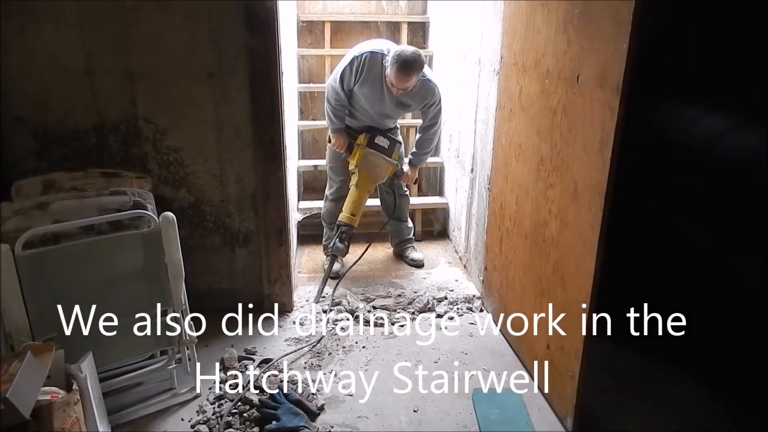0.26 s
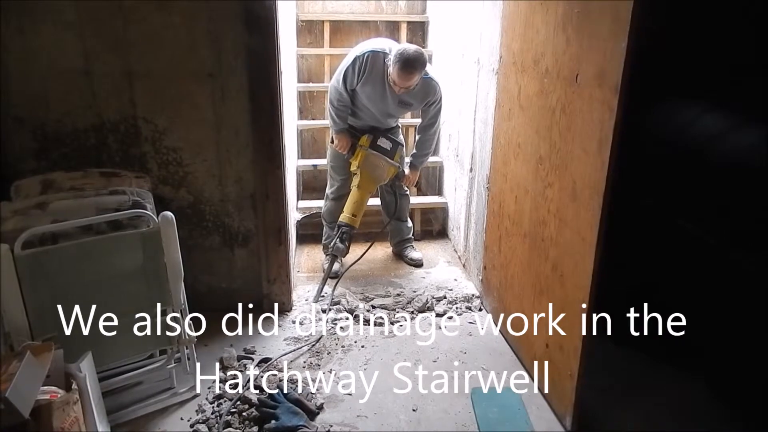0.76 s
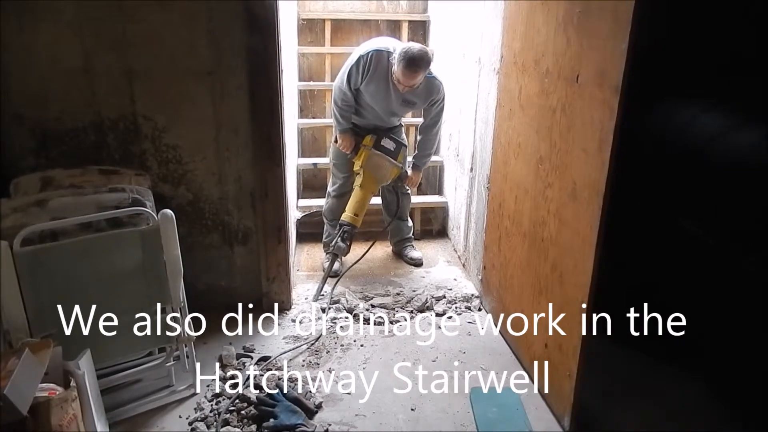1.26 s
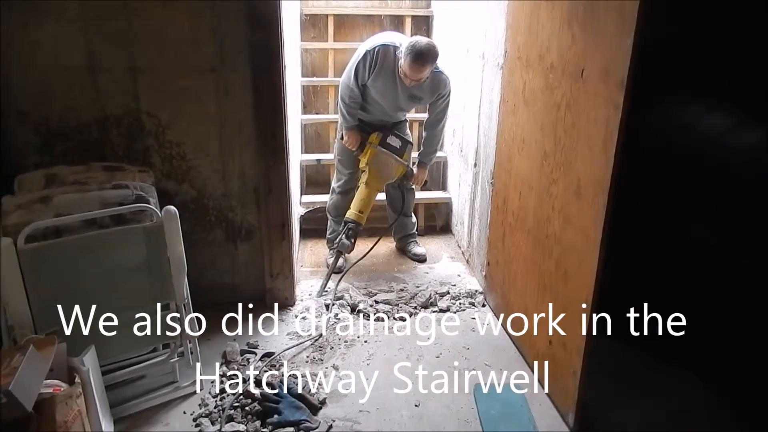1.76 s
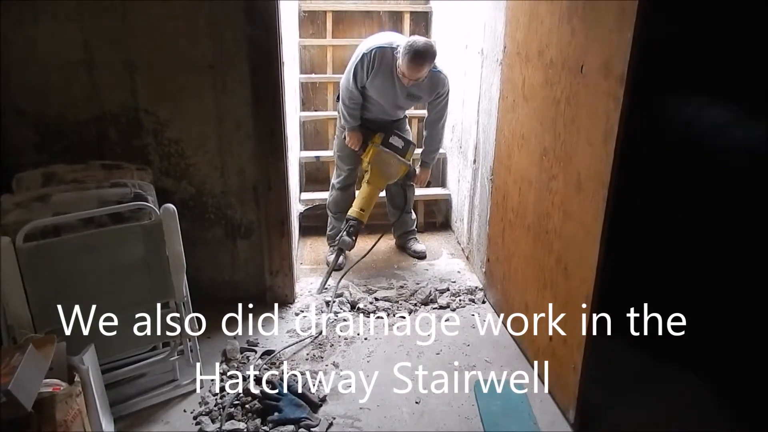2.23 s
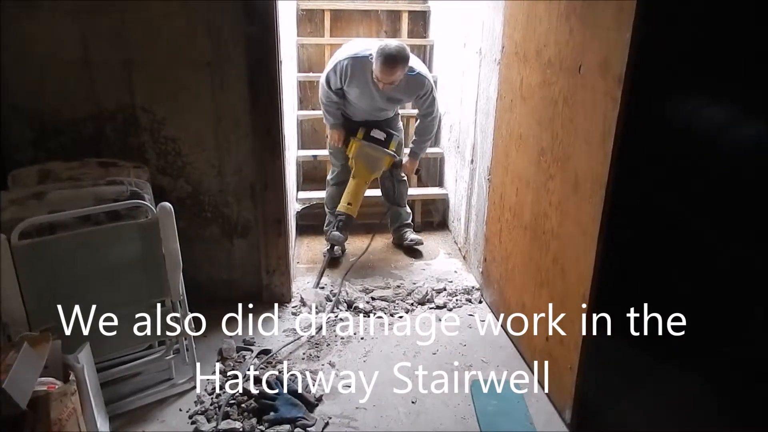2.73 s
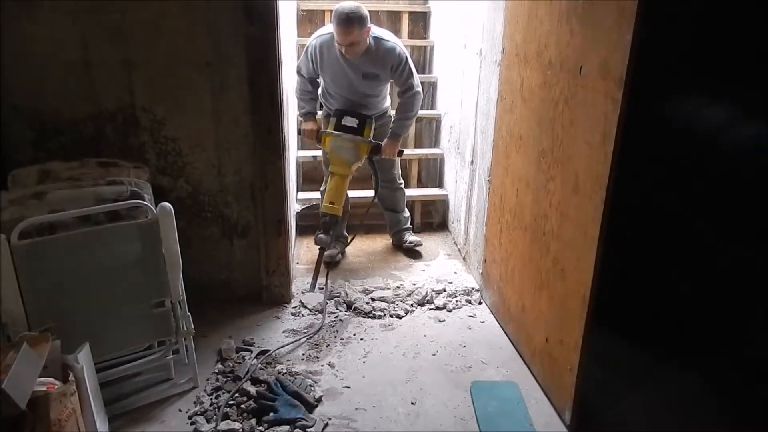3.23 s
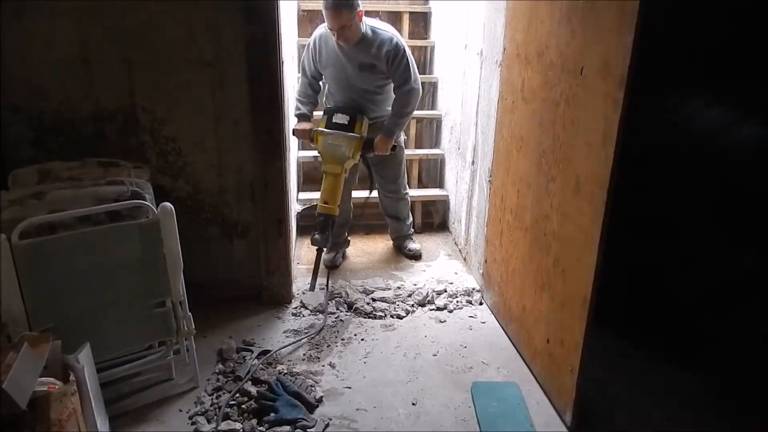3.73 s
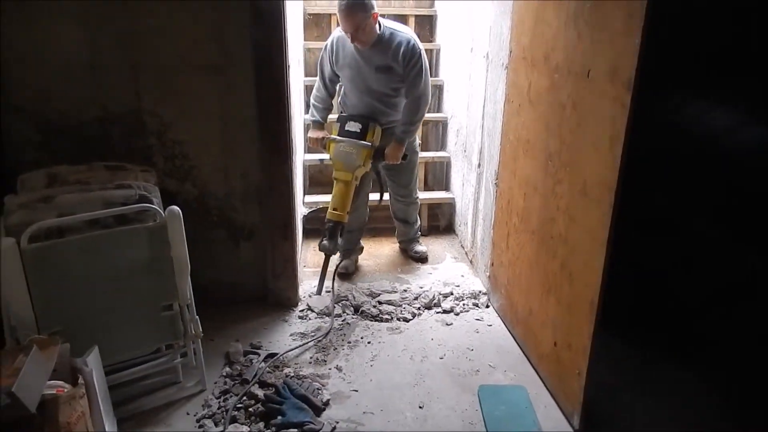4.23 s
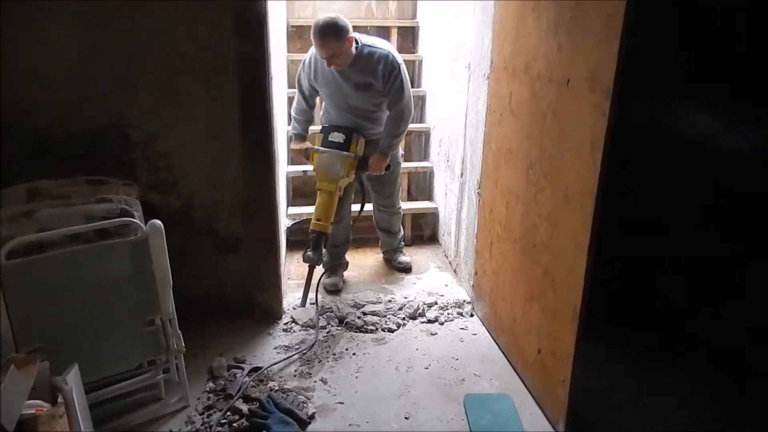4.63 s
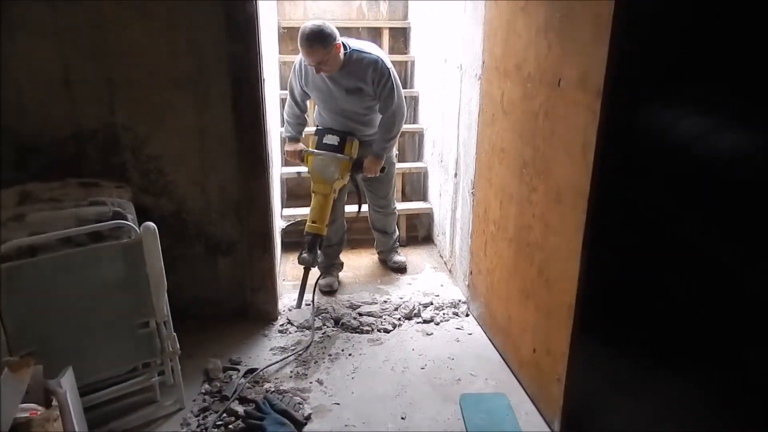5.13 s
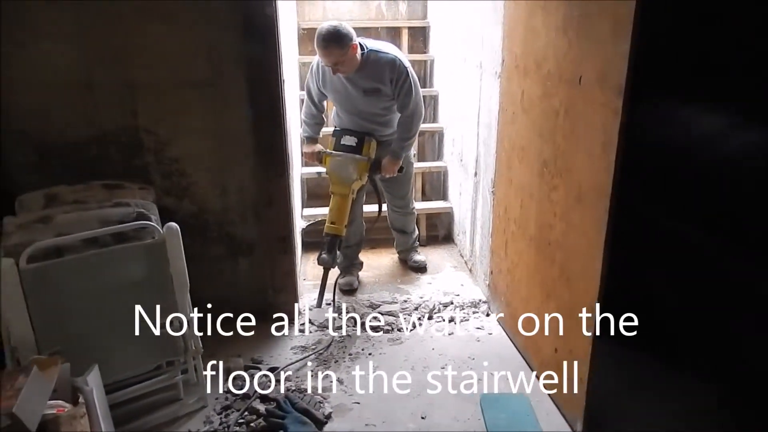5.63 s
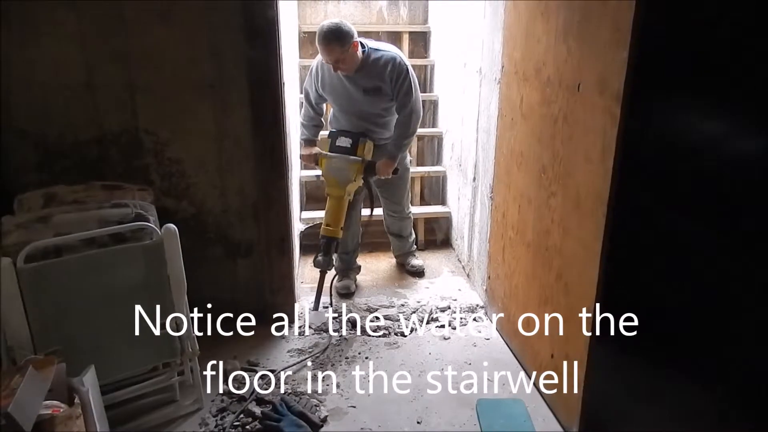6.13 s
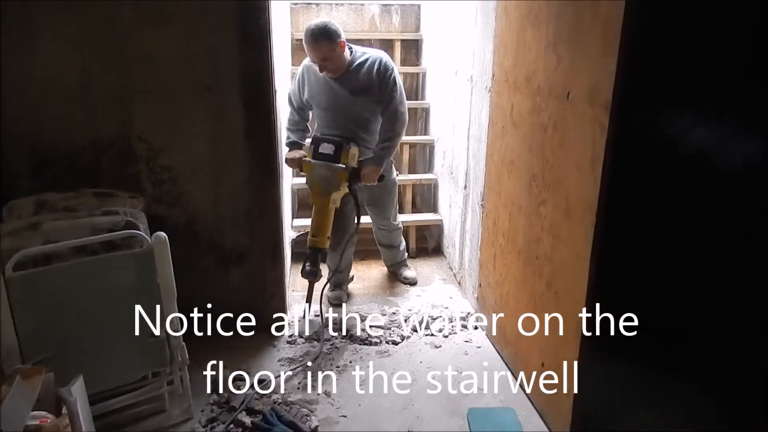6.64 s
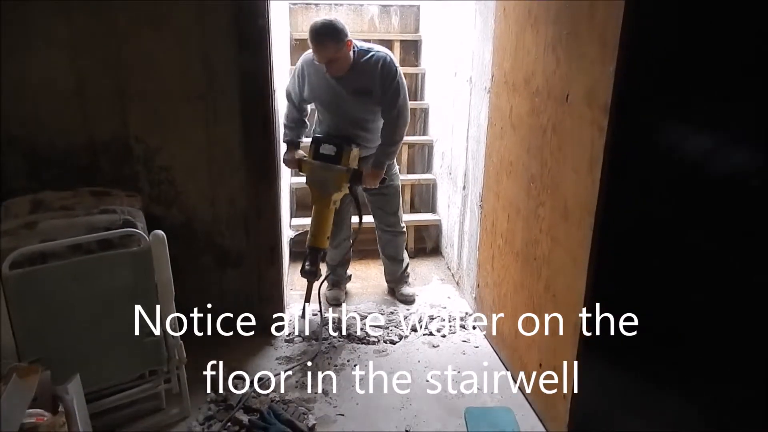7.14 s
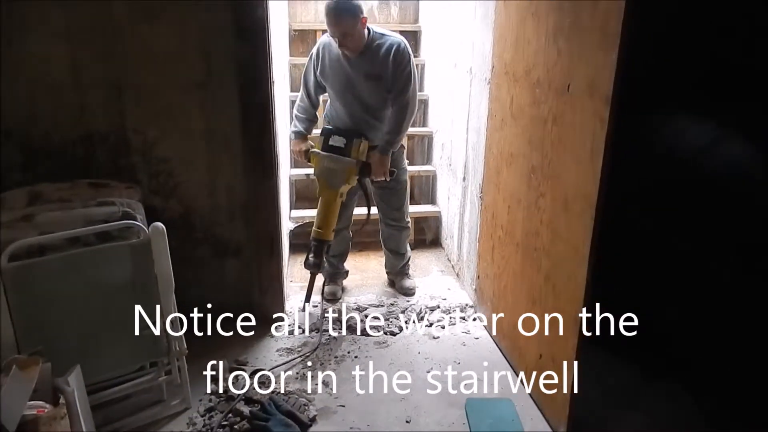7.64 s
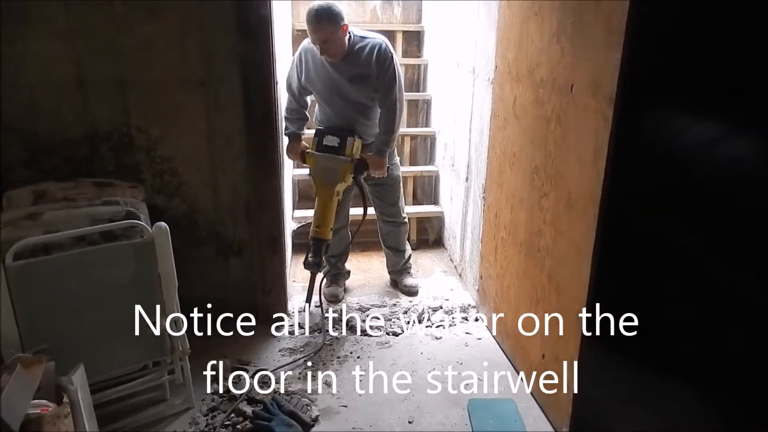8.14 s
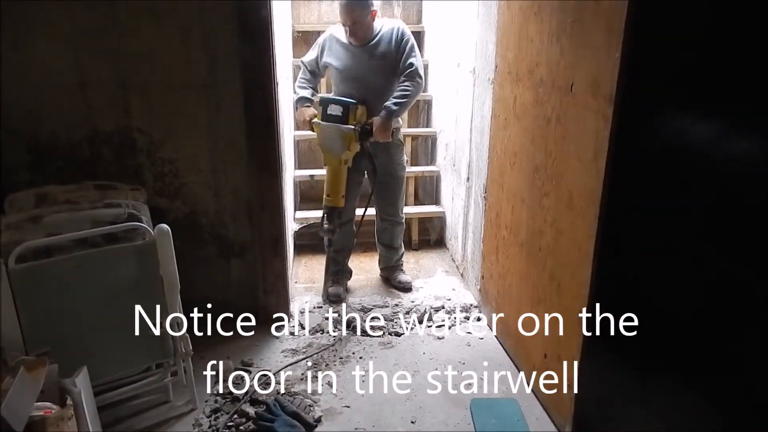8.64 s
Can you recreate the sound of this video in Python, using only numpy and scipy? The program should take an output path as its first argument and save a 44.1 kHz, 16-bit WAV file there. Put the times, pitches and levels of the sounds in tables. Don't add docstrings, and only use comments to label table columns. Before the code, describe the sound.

Close to a bare stairwell, an electric demolition hammer hammers concrete about fourteen times a second. At first each sharp steel crack comes with a deep slab boom; after two seconds the sound turns to looser, uneven crunching with bright chisel ringing. Motor rush and brush hiss fill the gaps. Near the end the blows slow, fade and stop, and the tool is set down with one clank.

```python
import sys
import numpy as np
from scipy import signal
from scipy.fft import rfft, irfft, next_fast_len
from scipy.io import wavfile

SR = 44100
rng = np.random.default_rng(int(sys.argv[2]) if len(sys.argv) > 2 else 0)


def makeup_ratio(level_db):
    decades = np.asarray(level_db, float) / 20
    return 10 ** decades


def to_wav(sig):
    pcm = np.clip(np.atleast_2d(sig), -1, 1) * 32767
    pcm = np.round(pcm).astype(np.int16)
    wavfile.write(sys.argv[1], SR, pcm.T)


N = 392037
LEAD = SR // 10
SPAN = SR // 3

# (time [s], steel crack [dB], thud [dB], slab [dB])
BLOWS = [(-0.014, -24.5, -27.5, -21.5), (0.0544, -26, -28, -22), (0.1224, -23.5, -25, -20.5),
         (0.189, -21.5, -23.5, -17.5), (0.2558, -28, -28.5, -24), (0.3262, -28.5, -33, -26.5),
         (0.394, -27, -29.5, -23.5), (0.4619, -25.5, -28.0, -22.5), (0.5293, -26.5, -29.5, -22),
         (0.598, -25, -27.5, -21.5), (0.6657, -26.5, -31.5, -22), (0.7339, -26.5, -29.0, -22.5),
         (0.8017, -24.5, -26, -21), (0.8689, -26.5, -29.0, -22), (0.9399, -26, -27.5, -22.5),
         (1.006, -25, -28.5, -20.5), (1.074, -26, -27.5, -22), (1.1418, -27, -30.0, -23.5),
         (1.2104, -29, -30.5, -24), (1.2781, -28, -29.5, -24), (1.3465, -27, -28.5, -23),
         (1.415, -26.5, -29.0, -24), (1.483, -26, -31, -23), (1.5522, -26.5, -28.5, -22.5),
         (1.6186, -28, -30.5, -23), (1.6887, -27.5, -28.5, -22.5), (1.7569, -26.5, -29.5, -23.5),
         (1.825, -26.5, -29.5, -23), (1.8945, -28.5, -31.0, -23), (1.962, -26.5, -28.5, -23.5),
         (2.0309, -25.5, -28, -22), (2.1011, -25.5, -29.0, -25.5), (2.17, -27, -29.5, -26.5),
         (2.2389, -26.5, -28.5, -34), (2.3088, -25.0, -31.0, -30.5), (2.3782, -24.5, -37.0, -34),
         (2.4505, -25.5, -35, -35), (2.521, -26.0, -35.5, -31), (2.5933, -25.0, -38.5, -28.5),
         (2.6637, -24.0, -36.5, -27.5), (2.7362, -24, -49, -26), (2.8081, -24, -36.5, -28),
         (2.881, -23.5, -36.5, -25.5), (2.9518, -24.5, -35.5, -30.0), (3.027, -24.5, -35, -28),
         (3.0945, -23.5, -32.5, -29.0), (3.165, -25.5, -34.0, -25.5), (3.2352, -22.5, -33, -25),
         (3.302, -25.5, -32.5, -27), (3.373, -26, -35, -27.0), (3.44, -25.5, -32, -28),
         (3.5115, -26, -31.5, -30.5), (3.5777, -29.5, -32, -28.5), (3.6518, -26.0, -33, -30),
         (3.7197, -26.5, -31, -29.0), (3.7917, -26.5, -35, -34.5), (3.8584, -25, -31, -27),
         (3.93, -24, -30.0, -25.0), (3.9978, -25.0, -31.5, -29.5), (4.0693, -28.5, -34, -32.5),
         (4.1393, -26.5, -32, -28.5), (4.213, -26, -30.5, -30), (4.2812, -25.5, -34, -26.5),
         (4.352, -25, -30, -28.0), (4.4214, -24.5, -33.0, -28.0), (4.492, -26.5, -29.0, -28),
         (4.561, -27.5, -31.5, -29), (4.631, -25.5, -33.5, -29), (4.702, -27.5, -34, -32.5),
         (4.771, -27.5, -30.5, -26), (4.841, -24.5, -27, -22), (4.9098, -25, -29.5, -25.0),
         (4.9792, -24, -32.5, -26.0), (5.0502, -24.5, -32, -26.5), (5.1183, -28.0, -35.5, -28.5),
         (5.189, -25, -34.5, -27.0), (5.257, -23.5, -29, -23.5), (5.3241, -24.5, -29, -24.5),
         (5.3943, -26.5, -29, -25.5), (5.464, -23.5, -31.0, -25.5), (5.5325, -24.5, -31.5, -26.0),
         (5.601, -23.5, -31.5, -22.5), (5.669, -24, -31, -27.0), (5.7381, -25.5, -31, -24),
         (5.8077, -24.5, -31.5, -24), (5.8757, -25, -31.5, -27.5), (5.9442, -24.0, -35.0, -29.5),
         (6.0109, -27.0, -33, -31), (6.0794, -27.0, -32.5, -28.5), (6.1481, -28.0, -32.5, -29.5),
         (6.2159, -25.5, -31.5, -28.0), (6.2837, -25.5, -29.5, -27), (6.3497, -26.5, -32, -35),
         (6.419, -26.5, -29.5, -30.0), (6.4885, -24.5, -31, -32), (6.554, -25.0, -32, -31),
         (6.6226, -25, -30.5, -32.5), (6.6888, -23.5, -29.5, -31.5), (6.756, -24.5, -29, -29),
         (6.8233, -25.5, -30, -30.5), (6.8895, -25.5, -29, -31.5), (6.9576, -25.5, -31.5, -34),
         (7.026, -22.5, -27, -29), (7.0921, -26.5, -32, -35), (7.1593, -26.5, -31.5, -30),
         (7.2275, -25.5, -29.5, -28.5), (7.2949, -27.0, -32.5, -31), (7.3618, -23.0, -33.0, -31),
         (7.431, -25.5, -31.5, -28.5), (7.5062, -24.5, -31.5, -28.5), (7.5895, -26.5, -32, -29.5),
         (7.6838, -25, -33, -31.5), (7.7913, -25.5, -29.5, -30.0), (7.907, -25, -34.5, -32.5),
         (8.0331, -30, -34.5, -38), (8.062, -33.5, -40, -34.0), (8.2002, -30, -34, -34.5),
         (8.4176, -42.5, -42, -36.5), (8.6396, -50, -47, -35.0), (8.7145, -22.5, -29.5, -24.5)]
# (time [s], seated in solid slab [0-1], likeness of blow to blow [0-1])
SEAT = [
    (0, 0.96, .88),
    (2.05, 1, 0.92),
    (2.3, 0.07, 0.46),
    (3, 0.04, 0.84),
    (4.5, 0.01, 0.22),
    (5.5, 0.01, 0.46),
    (8.9, 0.04, 0.6),
]
# (frequency [Hz], width [Hz], level [dB])
HOUSING = [(4360, 43, 6), (6450, 50, -1), (8220, 190, 4), (8960, 110, 4.5), (9750, 200, 6),
           (10500, 60, 2.5)]


def along(points, hz):
    f, v = np.transpose(points)
    return np.interp(np.log(hz + 1), np.log(f + 1), v)


def at(rows, t):
    s, *columns = np.transpose(rows)
    return [np.interp(t, s, column) for column in columns]


def filtered(x, response):
    size = next_fast_len(x.shape[-1] + SPAN)
    hz = np.fft.rfftfreq(size, 1 / SR)
    return irfft(rfft(x, size) * response(hz), size)[..., :x.shape[-1]]


def coloured(pair, spectrum, peaks=(), lo_hz=0, hi_hz=SR):
    # (frequency [Hz], left-right likeness [0-1])
    alike = [(60, 0.55), (180, 0.76), (550, 0.85), (1650, 0.89), (4970, 0.46), (15000, 0.04)]

    def response(hz):
        bumps = 1 + sum((makeup_ratio(db) - 1) / (1 + (2 * (hz - c) / w) ** 2) for c, w, db in peaks)
        band = np.sqrt((1 + (lo_hz / (hz + 1)) ** 8) * (1 + (hz / hi_hz) ** 8))
        gain = makeup_ratio(along(spectrum, hz)) * bumps / band
        cepstrum = irfft(np.log(gain / np.sqrt(np.mean(gain ** 2)) + 1e-6))
        cepstrum[1:len(hz) - 1] *= 2
        cepstrum[len(hz):] = 0
        turn = np.arccos(np.clip(along(alike, hz), -1, 1)) / 2
        return np.exp(rfft(cepstrum)) * [np.cos(turn), np.sin(turn)]

    mid, side = filtered(pair, response)
    return np.array([mid + side, mid - side])


def strikes(size):
    start = np.round(np.transpose(BLOWS)[0] * SR).astype(int) + LEAD
    return np.bincount(start, size, N + LEAD)


def answers(size, likeness, shape):
    pattern = shape * rng.standard_normal((2, SPAN))
    same = signal.fftconvolve(strikes(size * likeness)[None], pattern, axes=1)
    power = signal.fftconvolve(strikes(size ** 2 * (1 - likeness ** 2)), shape ** 2)
    new = np.sqrt(np.abs(power)) * rng.standard_normal(same.shape)
    return (same + new)[:, :N + LEAD]


def envelope(t60, rise, snap_db, snap_t60, echoes=((0, 0),)):
    t = np.arange(SPAN) / SR
    shape = (1 - np.exp(-t / rise)) * makeup_ratio(-60 * t / t60)
    for ms, db in echoes:
        late = t - ms / 1000
        snap = (late >= 0) * makeup_ratio(snap_db + db - 60 * np.abs(late) / snap_t60)
        shape = np.hypot(shape, snap)
    return shape / np.sqrt(np.mean(shape[t < 1 / 25] ** 2))


def ringing(modes, size, spread_db, rise, t60):
    out = np.zeros((2, N + LEAD))
    grow, fade = np.exp(-1 / (rise * SR)), makeup_ratio(-120 / (t60 * SR))
    for hz, db, ring_t60 in modes:
        power = strikes((size * makeup_ratio(db + spread_db * rng.standard_normal(len(size)))) ** 2)
        power = signal.lfilter([1 - grow], np.convolve([1, -grow], [1, -fade]), power)
        shared, *own = rng.standard_normal((3, N + LEAD))
        chatter = np.sqrt(np.abs(power)) * (0.55 * shared + 0.55 * np.array(own))
        pole = makeup_ratio(-60 / (ring_t60 * SR)) * np.exp(2j * np.pi * hz / SR)
        scale = pole.imag * np.sqrt(2 * (1 - abs(pole) ** 2))
        out += signal.lfilter([scale], [1, -2 * pole.real, abs(pole) ** 2], chatter)
    return out


def steel():
    # (frequency [Hz], density [dB per Hz])
    crack_colour = [(1760, -33), (3000, -14), (4070, -7.5), (4890, -6), (6100, -5.5), (7120, -6),
                    (7700, -8.5), (10700, -3), (13200, -21.5), (16000, -38), (16300, -55)]
    # (frequency [Hz], level [dB], t60 [s])
    families = [
        [(3015, -2, .16), (4800, -5, .16), (4960, -8, .16), (6890, -10, .16), (7110, -7, .16)],
        [(5495, 0, .2)],
        [(9210, 0, .18), (9580, -5, .16)],
        [(10735, 0, .18), (11720, -8, .18), (12270, -16, .16), (14400, -22, .14), (15650, -16, .16)],
    ]
    # (time [s], bending [dB], lengthwise [dB], shank [dB], higher lengthwise and
    # neighbours [dB])
    freedom = [(0.0, -42, -69, -53, -69), (0.28, -49, -69, -52, -67), (0.56, -35.5, -69, -69, -69),
               (0.84, -40, -69, -63, -69), (1.12, -44.5, -69, -66, -48), (1.4, -47, -69, -69, -50),
               (1.68, -53, -69, -69, -51), (1.96, -42, -63, -69, -53), (2.24, -42.5, -38, -69, -33),
               (2.519, -38.5, -39, -50, -33), (2.8, -41.5, -47, -49, -41), (3.08, -37, -50, -44.5, -44),
               (3.36, -35, -36, -39, -32.5), (3.64, -48, -47, -33, -38.5), (3.92, -48, -41, -51, -42),
               (4.2, -38, -69, -43, -42), (4.48, -32.5, -47, -36, -36), (4.76, -25, -55, -39, -29),
               (5.04, -36, -60, -38, -48), (5.32, -32, -45, -47, -37), (5.6, -39.5, -38, -39, -39.5),
               (5.88, -29.5, -36, -41, -40), (6.16, -39.5, -68, -61, -32), (6.44, -43.5, -33.5, -40, -35.5),
               (6.72, -44.5, -34, -36.5, -38), (7.0, -38, -36.5, -46, -44), (7.28, -43, -28.5, -43, -40.5),
               (7.56, -50, -44, -46, -46), (7.84, -43, -31, -45, -48), (8.12, -42, -69, -69, -69),
               (8.4, -38, -69, -69, -69), (8.68, -43, -69, -47, -62)]
    s, crack_db = np.transpose(BLOWS)[:2]
    likeness = 0.53 * at(SEAT, s)[1]
    shape = envelope(t60=0.2, rise=0.00087, snap_db=0.5, snap_t60=0.016, echoes=((1, 0), (3.5, -1)))
    out = coloured(answers(makeup_ratio(crack_db), likeness, shape), crack_colour, HOUSING)
    force_db = np.minimum(crack_db + 26, 3)
    for modes, db in zip(families, at(freedom, s)):
        out = out + ringing(modes, makeup_ratio(db + 11.5 + force_db), spread_db=4.0, rise=0.0039, t60=0.1)
    return out


def clicks(size, echoes, spread_db):
    out = np.zeros((2, N + LEAD))
    for ms, db in echoes:
        pulses = strikes(size * makeup_ratio(db + spread_db * rng.standard_normal(len(size))))
        out[0] += np.roll(pulses, round(ms * SR / 1000))
    return out


def concrete():
    # (frequency [Hz], width [Hz], level [dB])
    slab_colour = [(15, -52), (25, -19.5), (150, -19.5), (288, -7.5), (476, -15), (530, -5.5), (632, -15),
                   (857, -6), (977, -7), (1240, -1.5), (2390, 3), (3320, -10), (4600, -22), (5980, -71),
                   (10100, -120)]
    slab_peaks = [(292, 60, 5), (536, 22, 5), (877, 42, 7), (1204, 70, 5), (1190, 38, 6), (1410, 180, 6),
                  (1683, 40, 9.5), (1910, 25, -4), (2210, 35, -19.5), (2340, 15, 7), (3860, 190, 13.5)]
    # (frequency [Hz], width [Hz], level [dB])
    rubble_colour = [(15, -67), (25, -36), (85, -14.5), (150, -18), (358, 0), (476, -14), (839, -8.5),
                     (1420, -7), (2050, 9), (2720, -3), (3040, 7), (3540, 0.5), (4600, -9), (5980, -48),
                     (10100, -120)]
    rubble_peaks = [(349, 140, -4), (557, 26, 10), (842, 74, 6), (1305, 68, 8), (2096, 410, -6),
                    (2564, 58, 6.5), (3280, 180, -6.5)]
    # (delay [ms], level [dB])
    rebounds = [
        (0, 1.5),
        (4.5, 3),
        (14.5, 4),
        (19, -6),
        (25, -8.5),
        (31, -31),
        (38, -16.5),
    ]
    s, _, thud_db, slab_db = np.transpose(BLOWS)
    seated, likeness = np.clip(at(SEAT, s), 0, 1)
    firm = envelope(t60=0.41, rise=0.003, snap_db=4, snap_t60=0.021, echoes=rebounds)
    loose = envelope(t60=0.26, rise=0.0048, snap_db=2, snap_t60=0.033, echoes=((1.5, -0.5), (6, -1), (17, -3)))
    out = 0
    for db, band in ((thud_db, dict(hi_hz=972)), (slab_db, dict(lo_hz=997))):
        solid = makeup_ratio(db + 1.0) * np.sqrt(seated)
        broken = makeup_ratio(db - 0.9) * np.sqrt(1 - seated)
        boom = answers(solid, likeness, firm) + clicks(solid * makeup_ratio(17.5), rebounds, spread_db=1.5)
        crunch = answers(broken, likeness, loose)
        crunch = crunch + clicks(broken * makeup_ratio(18), ((2.5, -0.22), (7, -0.69)), spread_db=4.5)
        out = out + coloured(boom, slab_colour, slab_peaks, **band)
        out = out + coloured(crunch, rubble_colour, rubble_peaks, **band)
    return out


def motor():
    # (time [s], gear and fan [dB], brush hiss [dB])
    levels = [(0.0, -23, -22), (0.47, -27, -29), (0.99, -26, -25.5), (1.41, -28.5, -27.5),
              (2.01, -25.5, -24.5), (2.43, -29, -26.5), (2.55, -31.5, -27.5), (3.07, -30.5, -31),
              (3.34, -31, -27), (4.01, -28.5, -29.5), (4.83, -31.5, -31), (5.22, -30.5, -32),
              (5.47, -27.5, -23), (5.92, -31, -30), (6.16, -30.5, -28), (6.73, -26, -33),
              (7.35, -27.5, -29.5), (7.97, -32, -35.5), (8.22, -32, -41.5), (8.89, -31.5, -41)]
    # (frequency [Hz], density [dB per Hz])
    hum_colour = [(18, -85), (30, -28), (408, -9.5), (454, -7.5), (948, -5.5), (2110, -7.5), (2300, -9),
                  (2450, -9.5), (4600, -16.5), (5980, -54), (10100, -120)]
    # (frequency [Hz], density [dB per Hz])
    hiss_colour = [(1760, -23), (3000, -16.5), (3380, -9.5), (4500, -11), (6130, -12.5), (9200, -12.5),
                   (11000, -14), (16000, -77)]
    # (frequency [Hz], width [Hz], level [dB])
    gears = [(826, 110, 1), (1475, 150, 4), (2480, 180, 3.5)]
    t = (np.arange(N + LEAD) - LEAD) / SR
    hum_db, hiss_db = at(levels, t)
    wander = rng.standard_normal((2, 600))
    rattle_db = 2.1 * np.array([np.interp(55 * (t + 1), np.arange(600), row) for row in wander])
    hum, hiss = makeup_ratio(rattle_db)[:, None] * rng.standard_normal((2, 2, N + LEAD))
    hum = makeup_ratio(hum_db - 6.5) * coloured(hum, hum_colour, gears)
    hiss = makeup_ratio(hiss_db - 7.5) * coloured(hiss, hiss_colour, HOUSING)
    return hum + hiss


def set_down():
    # (frequency [Hz], level [dB], t60 [s])
    clank = [(671, -20, 0.098), (540, -32, 0.11), (1620, -20, .06), (3120, -31, .06), (4470, -21, .05),
             (6600, -28, .08), (9300, -33, .12)]
    last_blow = np.arange(len(BLOWS)) == len(BLOWS) - 1
    return ringing(clank, last_blow, spread_db=1, rise=0.0095, t60=0.13)


def scene():
    # (frequency [Hz], left minus right [dB])
    balance = [(60, -2), (180, -3.0), (550, -2.5), (1650, -3), (4970, 0), (15000, -2.5)]
    sound = steel() + concrete() + motor() + set_down()
    sides = filtered(sound, lambda hz: makeup_ratio([along(balance, hz) / 2, -along(balance, hz) / 2]))
    return sides[:, LEAD:]


def low_pass(x):
    return signal.sosfilt(signal.butter(12, 16480, fs=SR, output="sos"), x)


def record(dry):
    def two_paths(hz):
        low = 1 / (1 + (hz / 3900) ** 30)
        late = np.exp(-2j * np.pi * hz * 0.018)
        return (hz < 15850) * (1 - low + low * late)

    early = np.pad(dry, ((0, 0), (LEAD, 0)), "reflect")
    split = filtered(early, two_paths)
    rounded = split / (1 + np.abs(split / 0.8) ** 4) ** (1 / 4)
    return low_pass(rounded[:, LEAD:])


dry = scene()
out = record(dry)
to_wav(out)
```